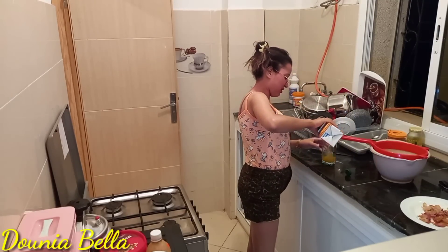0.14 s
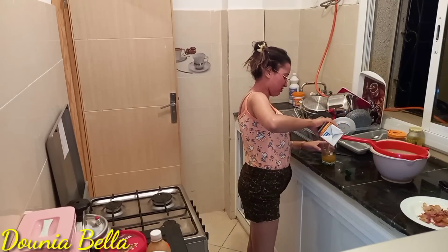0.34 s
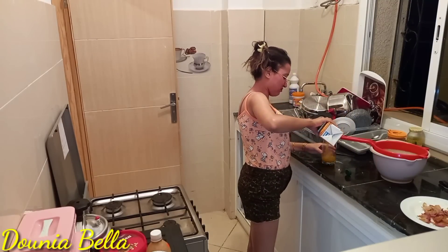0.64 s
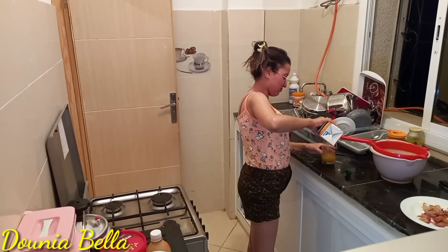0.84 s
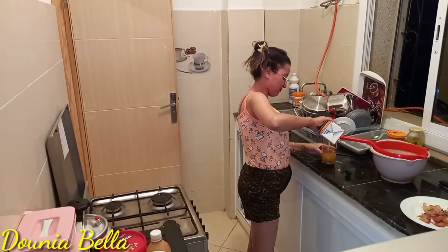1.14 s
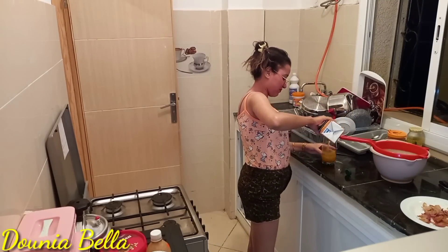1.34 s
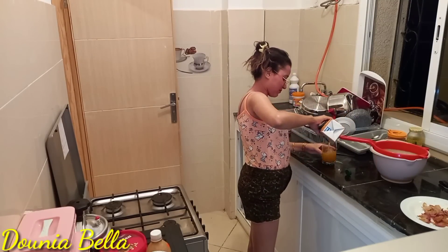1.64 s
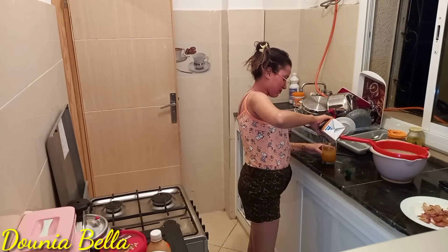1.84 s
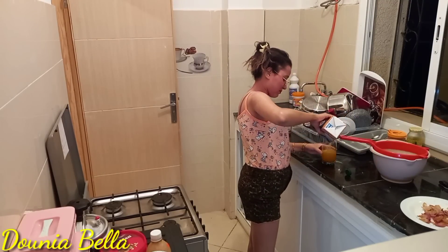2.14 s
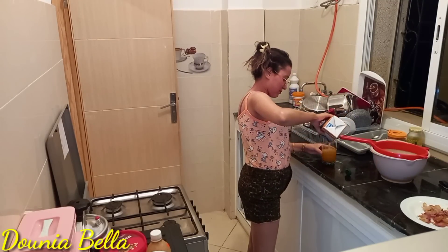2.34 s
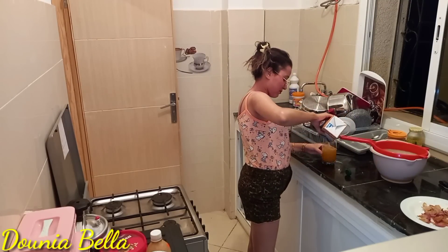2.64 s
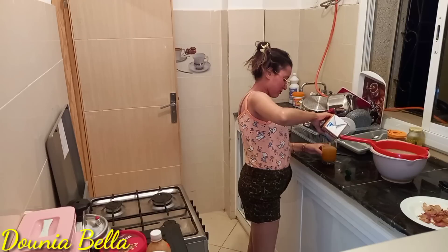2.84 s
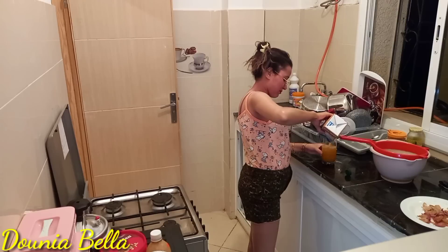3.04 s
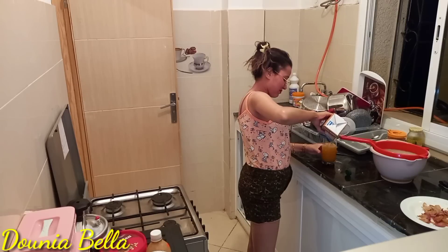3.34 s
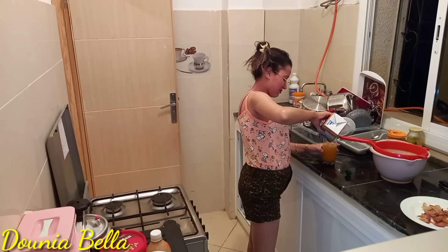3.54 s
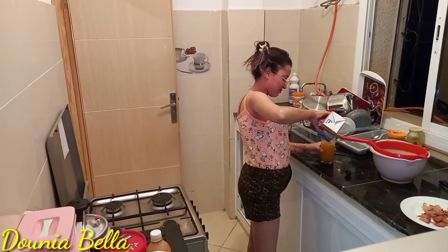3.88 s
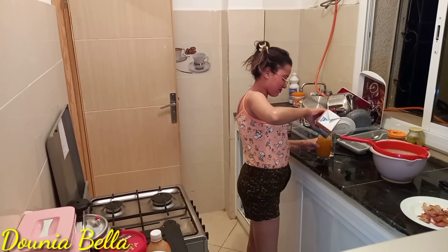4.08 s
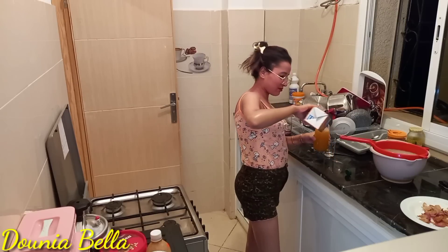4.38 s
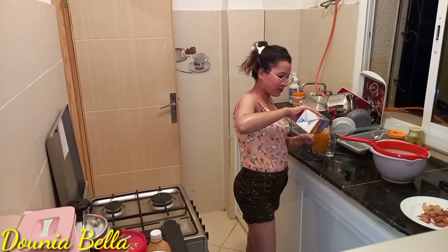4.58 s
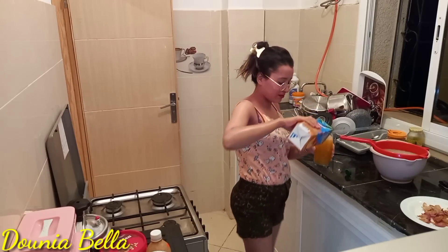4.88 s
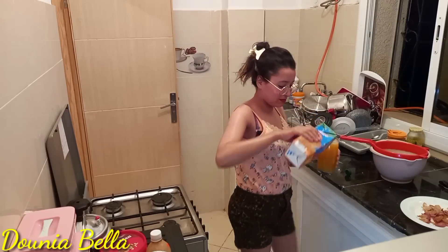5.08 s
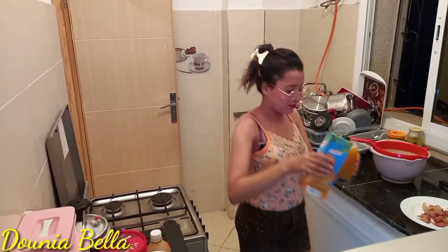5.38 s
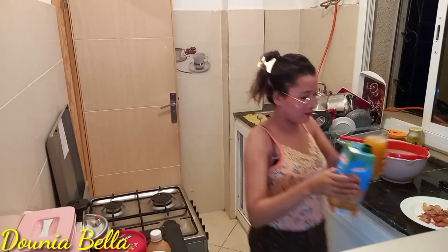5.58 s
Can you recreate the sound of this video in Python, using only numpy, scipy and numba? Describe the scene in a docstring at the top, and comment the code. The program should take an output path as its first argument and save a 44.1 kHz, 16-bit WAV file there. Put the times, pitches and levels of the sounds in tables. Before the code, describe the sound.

In a small tiled kitchen, about two metres from the microphone, a carton gulps air as juice splashes into a glass. The bubbly gurgles come irregularly, growing lighter and higher until the pour ends with a small wet smack. Quiet sloshes, crinkles and hollow thumps follow as the carton is tipped back, over a faint steady hiss and appliance hum.

```python
"""Juice glugs from a carton into a glass on the counter of a tiled kitchen, two metres away.
Each gulp of air rings as a bubble and lets a slug of juice splash down; short rings dot the pour, and
the air in the glass rises in pitch as it fills. The stream thins to a trickle, then the carton is
tipped upright, sloshing and rustling, over a faint appliance hum and hiss."""
import sys
import numpy as np
from scipy import signal
from scipy.fft import rfft, irfft
from scipy.io import wavfile
from scipy.ndimage import uniform_filter1d
from numba import njit

SR = 44100
rng = np.random.default_rng(int(sys.argv[2]) if len(sys.argv) > 2 else 0)


def waveform_to_disk(signal):
    """Save audio, clipped to [-1, 1], as 16-bit WAV at the path in sys.argv[1]."""
    frames = np.transpose(np.atleast_2d(signal))
    scaled = np.clip(frames, -1, 1) * 32767
    samples = np.round(scaled).astype(np.int16)
    wavfile.write(sys.argv[1], SR, samples)


N = 251976
T = np.arange(N) / SR


# Each row: start in seconds, pitch in Hz, level in dB, gap to the second bubble in seconds,
# its pitch in Hz, its level in dB, ring time in seconds, relative churn in dB, relative shards in dB.
GLUG_PAIRS = [ (0.000, 340, -31, 0.073, 340, -57, 0.072, -27, -34),
              (0.112, 414, -34, 0.053, 419.4, -33, 0.08, -15, -33),
              (0.397, 613, -30.5, 0.035, 607, -30, 0.046, -31, -16.5),
              (0.797, 587, -36.5, 0.019, 583, -28.5, 0.023, -18.5, 0),
              (1.294, 602, -35.5, 0.028, 608, -35.5, 0.051, -14.5, 3),
              (1.463, 720, -38, 0.03, 730, -35, 0.019, -9.5, 4),
              (1.513, 463, -32.5, 0.024, 427, -28.5, 0.047, -13, -3),
              (1.736, 382, -46, 0.034, 377, -43, 0.035, -13, -13),
              (1.979, 296, -44.5, 0.069, 347, -49, 0.07, -2.5, -11),
              (2.178, 870, -35.5, 0.019, 947, -39.5, 0.02, -5, -1.5),
              (2.181, 318, -49.5, 0.056, 316, -55.5, 0.034, -22, -13),
              (2.383, 967, -44.5, 0.038, 843, -39, 0.022, -5, -8),
              (2.401, 294, -45.5, 0.061, 313, -48.5, 0.036, -9, -9),
              (2.554, 1104, -51, 0.031, 1080, -74, 0.028, -8, 2),
              (2.666, 823, -31, 0.024, 853, -29.5, 0.029, -11.5, -14),
              (2.666, 333.5, -29.5, 0.072, 333, -33.5, 0.048, -9.5, -25),
              (2.835, 985, -43.5, 0.038, 893, -47.5, 0.038, -4.5, -5),
              (3.089, 982, -40, 0.042, 994, -35, 0.017, 0.5, 4),
              (3.145, 965, -44.5, 0.026, 940, -48, 0.011, -8, -13),
              (3.313, 1062, -38, 0.034, 1072, -44.5, 0.028, -13, -12),
              (3.571, 1032, -43, 0.027, 1168, -41, 0.018, -8, -8),
              (3.625, 1160, -47.5, 0.023, 1020, -50, 0.072, 6, 0.5),
              (3.701, 1036, -46.5, 0.047, 1086, -49.5, 0.021, 3.5, -3),
              (3.977, 1533, -44.5, 0.019, 1270, -48.5, 0.015, -7.5, -25),
              (3.985, 320, -47.5, 0.12, 320, -72, 0.1, -6, -16)]

def glugs(room):
    """Each glug is one large bubble and a second that breaks off as the first dies."""
    out = np.zeros((2, N))
    for start_s, hz, db, gap_s, second_hz, second_db, ring_s, churn_db, shards_db in GLUG_PAIRS:
        for delay_s, pitch_hz, level_db in [(0, hz, db), (gap_s, second_hz, second_db)]:
            glug = gurgle(room, pitch_hz, level_db, ring_s, churn_db, shards_db,
                          swell_s=0.0065, churn_s=0.019, shards_s=0.04)
            add(out, start_s + delay_s, glug)
    return out


# Standing waves favour one side. Each row: frequency in Hz, left minus right in dB.
STANDING_WAVE_PAN = [(300, -4), (340, 5.5), (400, 1), (600, -5), (720, 2.5), (870, -5), (1100, 3.5),
                     (2200, -2), (2750, 4), (3800, -3.5)]

def gurgle(room, hz, db, ring_s, churn_db, shards_db, swell_s, churn_s, shards_s, shard_count=4):
    """A bubble rings and sheds shards of nearby pitch while the juice churns round it."""
    t = T[:SR // 3]
    ring, shards = np.zeros((2, len(t)))
    glide = min(0.095 + 0.054 * hz / 1000, 0.21)
    add(ring, 0, bubble(hz * (1 - glide / 4), ring_s, glide, swell_s * hz))
    for k, (when, size) in enumerate(rng.random((shard_count, 2))):
        shard_hz = hz * 2 ** (0.22 * (2 * size - 1))
        shard = np.exp(-k / shard_count) * bubble(shard_hz, ring_s, glide, swell_s * hz)
        add(shards, shards_s * (k + when) / shard_count, shard)
    churn = rng.standard_normal(len(t)) * np.sqrt(t) * np.exp(-t / churn_s)
    churn = colour(churn, [(hz / 8, -14), (hz / 2, -7), (hz, 0), (hz * 1.28, -2),
                           (hz * 2, -10), (hz * 5, -24), (hz * 15, -45)])
    churn = colour(churn, [(50, -7), (125, 9), (225, -6), (310, 0)])  # a low burble near 125 Hz, a dip near 225 Hz
    sound = unit(ring) + undb(shards_db) * unit(shards) + undb(churn_db) * unit(churn)
    return across_room(sound, room, db, pan_db=at_pitch(STANDING_WAVE_PAN, hz))


def bubble(hz, ring_s, glide, swell_cycles):
    """A pocket of air swells, rings down 60 dB and rises in pitch by the share glide as it surfaces."""
    t = T[:int(ring_s * SR) + 2]
    swell_s = max(swell_cycles / hz, ring_s / 9)
    swell = 1 - np.exp(-(t / swell_s) ** 2)
    decay = np.exp(-np.log(1000) * t / ring_s)
    phase = 2 * np.pi * hz * t * (1 + glide * t / ring_s / 2)
    return swell * decay * np.sin(phase)


# Each row: start in seconds, pitch in Hz, level in dB, relative churn in dB, relative shards in dB.
SHORT_RINGS = [ (0.000, 747, -41.5, -19, -19), (0.001, 1090, -44, -2, -16), (0.002, 1990, -43, 6, -14),
               (0.053, 3020, -45.5, -19, -12), (0.088, 3610, -47, 1, -4), (0.095, 2100, -45, 5, -12),
               (0.098, 1040, -58, -1, -10), (0.205, 1910, -35, -8.5, -4), (0.207, 1135, -44, -12, -19),
               (0.222, 1710, -40, -5, -3), (0.314, 7200, -47.5, -25, -22), (0.315, 10800, -45.5, -15, -10),
               (0.32, 2310, -46, -14, 20), (0.345, 3110, -44, 4, 7), (0.448, 2180, -43, -17, -14),
               (0.462, 3130, -40.5, -4, -2), (0.492, 1200, -44, -5, -11), (0.527, 1040, -45.5, -6, -2),
               (0.634, 4800, -51.5, -15, -15), (0.636, 1990, -44, -8, 1), (0.656, 1830, -44, -15, -7),
               (0.641, 11600, -58, -10, -6), (0.654, 2930, -50, -19, -5), (0.76, 9800, -50.5, -20, -19),
               (0.808, 9400, -50, -16, -16), (0.815, 2820, -49, -7, -5), (0.843, 658, -36, -22, -1),
               (0.89, 4750, -51, -15, -21), (0.91, 2580, -47.5, 0, -2), (1.068, 2750, -34.5, -20, -16),
               (1.072, 2260, -32, -17, -5), (1.071, 4170, -42, 0, -7), (1.076, 1080, -55.5, -22, -5),
               (1.108, 1060, -42.5, -22, -8), (1.203, 3610, -51, -35, -24), (1.205, 12700, -49, 0, -10),
               (1.288, 1270, -36.5, -5, -5), (1.288, 1860, -39, -10, 3), (1.297, 8000, -53, -10, -4),
               (1.315, 850, -42, -24, -3), (1.47, 2740, -52, -18, -12), (1.522, 660, -33.5, -35.5, -3),
               (1.53, 2460, -46, -17, -17), (1.536, 4630, -43.5, -6, -23), (1.63, 710, -43, -7, 1),
               (1.741, 3840, -45, -24, -11), (1.743, 7260, -45, -19, -14), (1.738, 690, -45.5, -21, -6),
               (1.79, 2100, -48.5, 7, -14), (1.984, 2820, -45.5, -12, -9), (1.982, 7000, -54, -12, -18),
               (1.983, 7740, -62, -22, -20), (1.985, 4900, -47.5, -9, -14), (2.068, 4000, -46, -13, -4),
               (2.076, 3650, -46.5, -3, -14), (2.1, 825, -48.5, 5, 0), (2.264, 2770, -48, -4, 0),
               (2.389, 2570, -46, -15, -12), (2.438, 610, -59, 4, -5), (2.464, 830, -47.5, -12, -18),
               (2.557, 2910, -48.5, -24, -8), (2.589, 3960, -48.5, -25, -10), (2.666, 2750, -41, -7, -17),
               (2.673, 4620, -45.5, -18, -6), (2.68, 12400, -50, -22, -18), (2.863, 2750, -45.5, -24, -11),
               (3.082, 2230, -53, -22, -8), (3.106, 7540, -52, -12, -8), (3.111, 4400, -51.5, -6, -13),
               (3.14, 2040, -49, -24, -14), (3.26, 4300, -57, -8, 1), (3.336, 4560, -52, -17, 3),
               (3.392, 2670, -51.5, -24, -7), (3.46, 6000, -63, -12, -1), (3.574, 4580, -47.5, -10, -3),
               (3.741, 2940, -49, -14, -5), (3.752, 4390, -53, -11, -6), (3.882, 3820, -55, -15, 1),
               (3.943, 3390, -48.5, -5, 1), (3.985, 4450, -50.5, 0, -3), (4.028, 13700, -53, 0, 0),
               (4.042, 2940, -48.5, 5, -7), (4.066, 1630, -55.5, -10, -13), (4.126, 3150, -46, 0, -5),
               (4.15, 3050, -48.5, -5, -8), (4.192, 2380, -49, 3, -8), (4.212, 1550, -51, -10, -8),
               (4.37, 9900, -57, -14, -10), (4.552, 4050, -57, -2, -1)]

def short_rings(spot_count=5):
    """Drop plinks, glug overtones and extra bubbles, ringing peaks of the splashes and glass."""
    out = np.zeros((2, N))
    spots = [kitchen(direct_db=-9.5) for _ in range(spot_count)]  # each with its own reflections
    for k, (start_s, hz, db, churn_db, shards_db) in enumerate(SHORT_RINGS):
        ring_s = 0.026 * (600 / hz) ** 0.51  # higher rings die sooner
        ring = gurgle(spots[k % spot_count], hz, db, ring_s, churn_db, shards_db,
                      swell_s=0.0018, churn_s=0.016, shards_s=0.036)
        add(out, start_s, ring)
    return out


# Slugs landing, then a last wet smack at the spout. Each row: start in seconds, relative level in dB,
# low-mid in dB, high treble in dB, fizz pitch in Hz, fizz in dB, rise in seconds, decay in seconds.
SLUG_SPLASHES = [ (0.005, -43.5, -15, -2.5, 10000, -8, 0.023, 0.095),
                 (0.31, -42.5, -12, 1, 7100, 2, 0.0015, 0.063),
                 (0.42, -40, 0.5, -5, 9700, 11, 0.0048, 0.03),
                 (0.514, -40.5, -5, -4, 9500, 8, 0.0085, 0.019),
                 (0.628, -43, -15, -3, 10200, -14, 0.011, 0.041),
                 (0.75, -44, -12.5, -10.5, 9700, -3, 0.0025, 0.1),
                 (1.045, -46.5, -15, -2, 9150, -11, 0.0087, 0.012),
                 (1.071, -45, -16, -3, 9550, 1, 0.001, 0.016),
                 (1.25, -39, 3.5, -2, 9700, 11, 0.0048, 0.014),
                 (1.274, -42, -22, -8, 10400, -3, 0.007, 0.057),
                 (1.515, -39, -7.5, -6.5, 9800, 2, 0.0048, 0.057),
                 (1.729, -42.5, -2, 2, 7500, 13, 0.0091, 0.024),
                 (1.964, -41.5, -5, -3.5, 7700, 18, 0.017, 0.027),
                 (2.062, -44.5, -10, -6, 10000, -7, 0.0026, 0.021),
                 (2.18, -39.5, -14.5, -2, 11100, -9, 0.0034, 0.037),
                 (2.376, -43, -5.5, -5, 7000, -21, 0.015, 0.046),
                 (2.658, -37, -11, -6.5, 6200, -17, 0.004, 0.043),
                 (2.761, -42, -8, -2, 12300, -2, 0.0018, 0.0082),
                 (2.872, -44.5, -27, -6, 8360, 15, 0.012, 0.014),
                 (3.093, -43, -9.5, -1, 8200, 7, 0.01, 0.03),
                 (3.332, -51.5, 3, -10, 4700, 15, 0.005, 0.011),
                 (3.555, -44.5, -11, 0, 10800, -2, 0.0025, 0.04),
                 (3.742, -43.5, -2, -4, 7100, -11, 0.0027, 0.009),
                 (4.425, -42, -19.5, -4, 3960, -3, 0.0066, 0.01),
                 (4.446, -50.5, -15, -6, 4230, -16, 0.0061, 0.036)]

def splashes(air_hz, trim_db=-1.5, glass_db=-3.0):
    """Each slug bursts into a spray of droplets that rings the glass and fizzes with tiny bubbles."""
    out, t = np.zeros((2, N)), T[:SR // 3]
    steady = np.ones(len(t))
    for start_s, db, body_db, top_db, fizz_hz, fizz_db, rise_s, decay_s in SLUG_SPLASHES:
        rise = 1 - np.exp(-t / rise_s)
        decay = np.exp(-t / decay_s) + 0.15 * np.exp(-t / (3 * decay_s))
        spray = droplets(len(t), per_s=3200, spread_db=10) * rise * decay
        spray = colour(spray, [(90, body_db - 34), (220, body_db + 4), (350, body_db + 2.5),
                               (1200, body_db + 10), (3000, body_db + 14), (6500, 0), (13000, top_db)])
        third_mode_hz = 3 * air_hz[int(start_s * SR)]
        spray += undb(glass_db) * resonate(spray, third_mode_hz * steady, q=7.7)
        spray += undb(fizz_db) * resonate(spray, fizz_hz * steady, q=4.3)
        landing_spot = kitchen()
        add(out, start_s, across_room(spray, landing_spot, db + trim_db))
    return out


# Each row: frequency in Hz, relative spectral level in dB.
SPATTER_SPECTRUM = [(200, -41), (400, 1.5), (1000, 12), (2200, -9), (4000, 18), (7000, 7), (11000, 8),
                    (15500, -0.5)]

def stream(room, air_hz, fizz_db=-5.5, bubble_count=1500):
    """The thin stream patters on between glugs and folds small bubbles into the juice."""
    fizz = np.zeros(N)
    for when, pitch, faintness, life in rng.random((bubble_count, 4)):
        hz = 1900 * 4.82 ** pitch
        ping = bubble(hz, ring_s=(15 + 40 * life) / hz, glide=0.067, swell_cycles=0.94)
        add(fizz, when * N / SR, undb(-16 * faintness) * ping)
    spatter = colour(droplets(N, per_s=1000, spread_db=10), SPATTER_SPECTRUM)
    patter = unit(in_glass(spatter, air_hz)) + undb(fizz_db) * unit(fizz)
    return signal.fftconvolve((patter * flow())[None], room, axes=1)[:, :N]


# The thinning stream; its faint patter carries on as background noise.
# Each row: time in seconds, level in dB.
PATTER_LEVELS = [(0, -44), (.28, -79), (.5, -52), (.72, -64), (1.0, -54), (1.7, -54), (2.5, -63),
                 (3.9, -65), (4.15, -67), (4.32, -68)]

def flow(wake_db=-24, wake_peak_s=0.18):
    """Gain of the patter: a thinning stream that swells in the wake of every glug."""
    times_s, levels_db = np.transpose(PATTER_LEVELS)
    power = undb(np.interp(T, times_s, levels_db)) ** 2
    for start_s, _, glug_db, *_ in GLUG_PAIRS:
        age = np.maximum(T - start_s, 0) / wake_peak_s
        wake = undb(glug_db + wake_db) * age ** 2 * np.exp(1 - age ** 2)
        power += wake ** 2
    return np.sqrt(power)


def air_column(empty_m=0.159, full_m=0.0624, fill_m_per_s=0.0256):
    """Quarter-wave pitch in Hz of the air above the rising juice."""
    length_m = np.maximum(empty_m - fill_m_per_s * T, full_m)
    return 343 / (4 * length_m)


def in_glass(x, air_hz, first_db=13, third_db=7, q=11.6):
    """The air above the juice rings as a pipe closed at one end."""
    return x + undb(first_db) * resonate(x, air_hz, q) + undb(third_db) * resonate(x, 3 * air_hz, q)


# The highest pitches are the carton's rustles. Each row: start in seconds, centre in Hz, level in dB.
SLOSHES_AND_RUSTLES = [(4.646, 1670, -52.5), (4.698, 398, -55), (4.716, 2950, -53), (4.85, 3500, -58),
                       (5.091, 310, -53), (5.097, 860, -57.5), (5.174, 178, -54), (5.22, 4800, -59.5),
                       (5.401, 1190, -53.5), (5.405, 9400, -60), (5.433, 2200, -52), (5.51, 2920, -57),
                       (5.656, 2610, -57.5)]

def sloshes_and_rustles(room, decay_s=0.026, rise_octaves=0.27, ring_db=-4):
    """Juice sloshes and the carton rustles and crinkles as it swings upright."""
    out, t = np.zeros((2, N)), T[:SR // 2]
    decay = np.exp(-t / decay_s)
    for start_s, hz, db in SLOSHES_AND_RUSTLES:
        burst = droplets(len(t), per_s=1200, spread_db=7) * np.sqrt(t) * decay
        burst = colour(burst, [(hz / 4, -14), (hz * 0.93, -3), (hz, 0),
                               (hz * 1.07, -6), (hz * 4, -15), (hz * 15, -30)])
        ring_hz = hz * 2 ** (rise_octaves * (0.5 - decay))  # a slosh rises as it closes in on the air
        burst += undb(ring_db) * resonate(burst, ring_hz, q=3.7)
        add(out, start_s, across_room(burst, room, db))
    return out


# Each row: peak time in seconds, level in dB, half length in seconds.
CARTON_BOOMS = [(2.723, -50.5, 0.032), (4.19, -58, 0.18), (5.003, -61, 0.062), (5.257, -54, 0.12)]

def booms(pitch_hz=104.5):
    """The hollow carton booms as it flexes, is lifted and swung."""
    swells = sum(undb(db) * np.exp(-((T - peak_s) / half_s) ** 2) for peak_s, db, half_s in CARTON_BOOMS)
    return swells * tone(pitch_hz * (1 + 0.0393 * wander(per_s=10)))


# Each row: frequency in Hz, relative spectral level in dB.
HISS_SPECTRUM = [(15, -36), (25, -1.5), (93, 6.5), (240, -4), (399, 1.5), (552, -12), (970, -10.5),
                 (1140, -22), (1620, -1), (2230, -24), (2770, -4), (4260, -10), (10100, -12.5),
                 (14300, -21.5), (15500, -18.5)]

def hiss(level_db=-56, waver_db=0.96):
    """Steady hiss, more alike left and right in the bass."""
    mid, side = colour(rng.standard_normal((2, N)), HISS_SPECTRUM)
    side = colour(side, [(80, -3), (300, -7), (700, 0), (10000, 0)])
    return unit(np.array([mid + side, mid - side])) * undb(level_db + waver_db * wander(per_s=2.36))


# Each row: frequency in Hz, level in dB.
HUM_TONES = [(101, -68.5), (165, -76.5), (318, -74.5), (388, -75)]

def hum(waver_db=2, waver_hz=3.48):
    """A kitchen appliance hums, each tone wavering in level and pitch."""
    return sum(undb(db + waver_db * wander(per_s=13)) * tone(hz + waver_hz * wander(per_s=23))
               for hz, db in HUM_TONES)


# Each row: band centre in Hz, time to fall 60 dB in seconds.
REVERB_TIMES = [(150, 0.5), (500, 0.25), (2000, 0.46), (6000, 0.29), (14000, 0.28)]
# Each row: mode frequency in Hz, strength in dB.
KITCHEN_MODES = [(339, 3), (393, 7.5), (553, -6), (608, -2.5), (649, -20), (742, -24), (858, -15.5),
                 (888, -0.5), (1025, -6.5), (1064, -11), (1729, -16), (2121, -1), (2406, -19), (2748, -4)]

def kitchen(direct_db=-12.5, early_db=-2.5, early_s=0.011, mode_width_hz=13,
            spacing_m=0.31, left_lag_s=0.00035):
    """Tiled room at two microphones: direct sound, early reflections, a diffuse tail and ringing modes."""
    t = T[:SR // 2]
    size = len(t)
    hz = np.fft.rfftfreq(size, 1 / SR)
    noise = rfft(rng.standard_normal((2, size)))
    centres_hz, t60s = np.transpose(REVERB_TIMES)
    tail = np.zeros((2, size))
    for weights, t60_s in zip(np.eye(len(t60s)), t60s):
        band = irfft(noise * at_pitch(np.c_[centres_hz, weights], hz), size)
        tail += band * np.exp(-np.log(1000) * t / t60_s)
    early = rng.standard_normal((2, size)) * (rng.random((2, size)) < 0.03) * np.exp(-t / early_s)
    diffuse = rfft(unit(tail) + undb(early_db) * unit(early)) / np.sqrt(2 * size)
    modes = 1 + sum(undb(db) / (1 + 2j * (hz - mode_hz) / mode_width_hz) for mode_hz, db in KITCHEN_MODES)
    coherence = np.sinc(2 * hz * spacing_m / 343)  # long waves reach both microphones alike
    mid, side = irfft(diffuse * modes * np.sqrt([1 + coherence, 1 - coherence]), size)
    room = np.array([mid + side, mid - side])
    room[0, int(left_lag_s * SR)] += undb(direct_db)
    room[1, 0] += undb(direct_db)
    return room


def across_room(x, room, db, pan_db=0):
    """Carry a short sound through the room; db is its loudest 20 ms on arrival."""
    wet = signal.fftconvolve(x[None], room, axes=1)
    loudest = np.sqrt(uniform_filter1d(wet ** 2, SR // 50, axis=1).max(axis=1))
    channel_db = db + np.array([pan_db, -pan_db]) / 2
    return wet * (undb(channel_db) / loudest)[:, None]


def droplets(size, per_s, spread_db):
    """Random tiny impacts, a few much stronger than the rest."""
    hits = rng.random(size) < per_s / SR
    sign = rng.choice([-1, 1], size)
    strength_db = spread_db * np.minimum(rng.standard_normal(size), 2)
    return hits * sign * undb(strength_db)


@njit
def resonate(x, hz, q):
    """Band-pass with a moving centre and gain one there."""
    y, band_state, low_state = np.empty(len(x)), 0., 0.
    for i in range(len(x)):
        g = np.tan(np.pi * hz[i] / SR)
        band = (band_state + g * (x[i] + 1e-18 - low_state)) / (1 + g * (g + 1 / q))
        band_state = 2 * band - band_state
        low_state += 2 * g * band
        y[i] = band / q
    return y


def colour(x, points):
    """Filter by a smooth curve of (Hz, dB) points."""
    size = x.shape[-1]
    gain = undb(at_pitch(points, np.fft.rfftfreq(size, 1 / SR)))
    return irfft(rfft(x) * gain, size)


def at_pitch(points, hz):
    """Read (Hz, value) points on a log-frequency axis."""
    points_hz, values = np.transpose(points)
    return np.interp(np.log(hz + 1), np.log(points_hz), values)


def tone(hz):
    """Sine of rms one with a moving pitch."""
    return np.sqrt(2) * np.sin(2 * np.pi * np.cumsum(hz) / SR)


def wander(per_s):
    """Slow random drift of rms one."""
    hold = int(SR / per_s)
    steps = np.repeat(rng.standard_normal(N // hold + 1), hold)
    return unit(uniform_filter1d(steps, hold)[:N])


def add(out, start_s, x):
    """Mix a sound in at a time."""
    i = max(int(start_s * SR), 0)
    x = x[..., :max(N - i, 0)]
    out[..., i:i + x.shape[-1]] += x


def undb(db):
    """Decibels to gain."""
    return 10 ** (np.asarray(db) / 20)


def unit(x):
    """Scale to an rms of one."""
    return x / np.sqrt(np.mean(x ** 2) + 1e-18)


def scene():
    """The pour, the carton and the background of one kitchen."""
    room, air_hz = kitchen(), air_column()
    pour = glugs(room) + short_rings() + splashes(air_hz) + stream(room, air_hz)
    carton = sloshes_and_rustles(room) + booms()
    return pour + carton + hiss() + hum()


# The right microphone port is duller. Each row: frequency in Hz, left minus right in dB.
PORT_BALANCE = [(4500, 0.5), (8500, -1), (11000, 9.5), (15000, 4)]

def record(dry, low_hz=38, top_hz=15450):
    """The two ports differ in the treble; the recorder cuts rumble and the very top."""
    left = colour(dry[0], [(hz, db / 2) for hz, db in PORT_BALANCE])
    right = colour(dry[1], [(hz, -db / 2) for hz, db in PORT_BALANCE])
    rumble_cut = signal.butter(2, low_hz, "high", fs=SR, output="sos")
    top_cut = signal.ellip(10, 0.2, 70, top_hz, fs=SR, output="sos")
    return signal.sosfilt(top_cut, signal.sosfilt(rumble_cut, np.array([left, right])))


dry = scene()
out = record(dry)
waveform_to_disk(out)
```